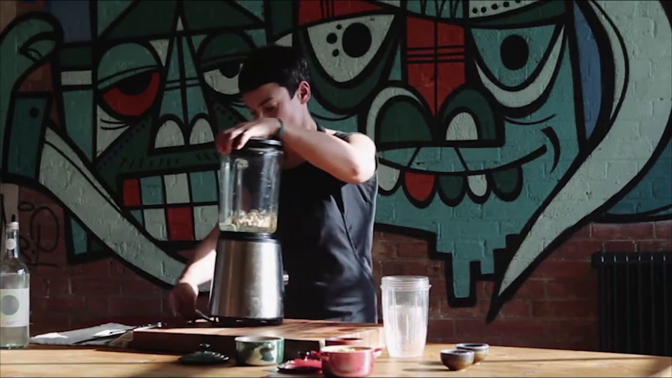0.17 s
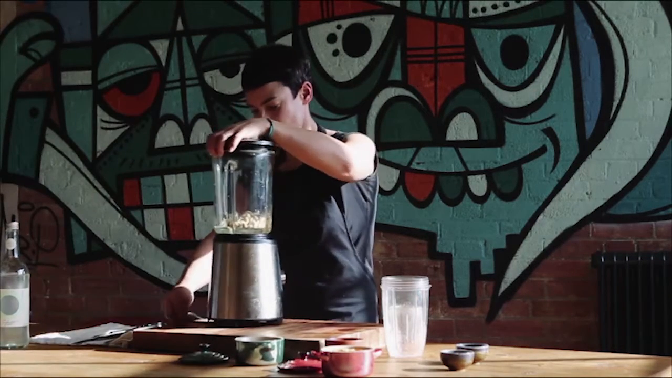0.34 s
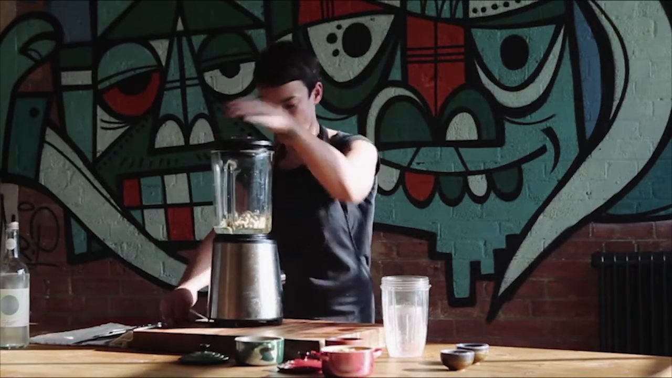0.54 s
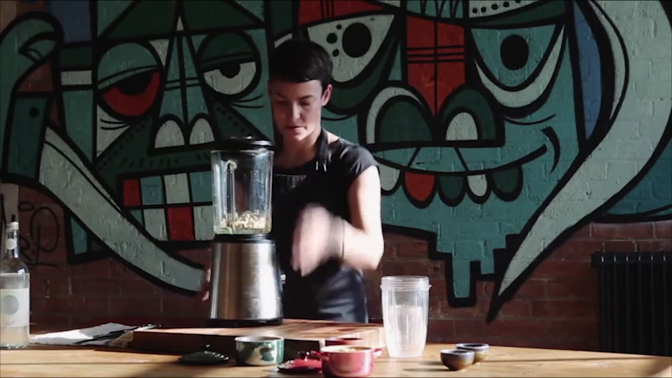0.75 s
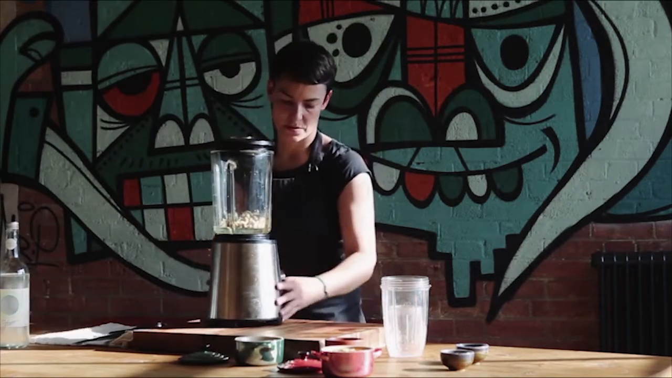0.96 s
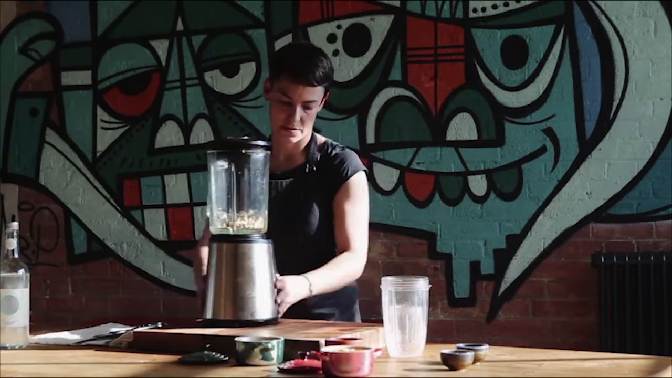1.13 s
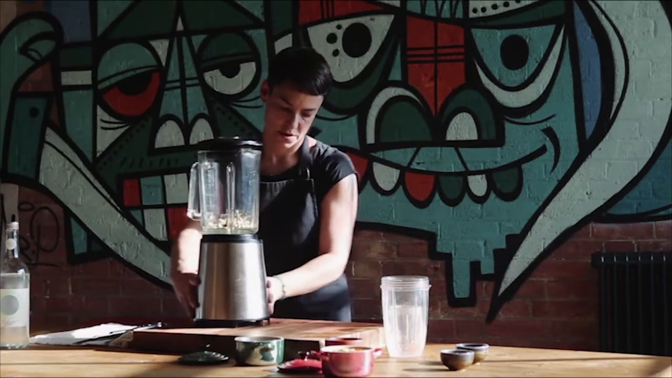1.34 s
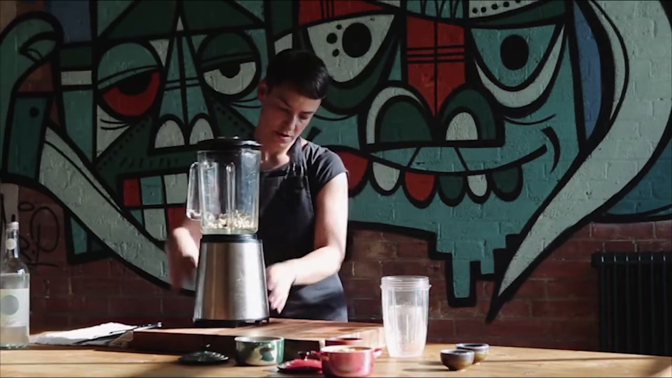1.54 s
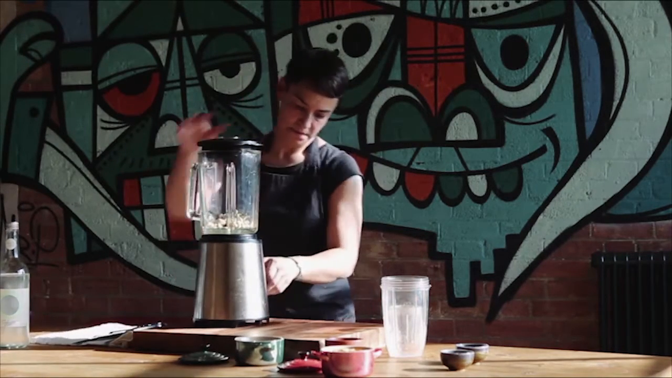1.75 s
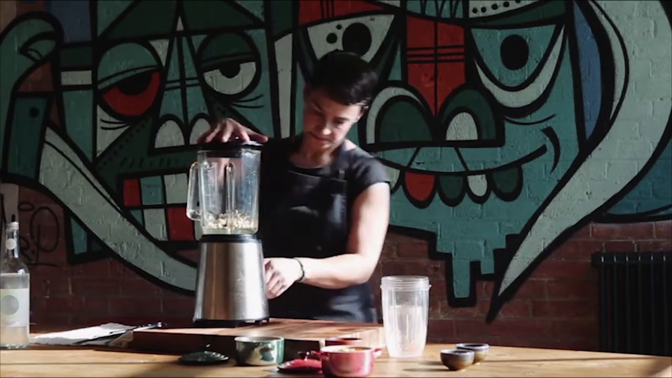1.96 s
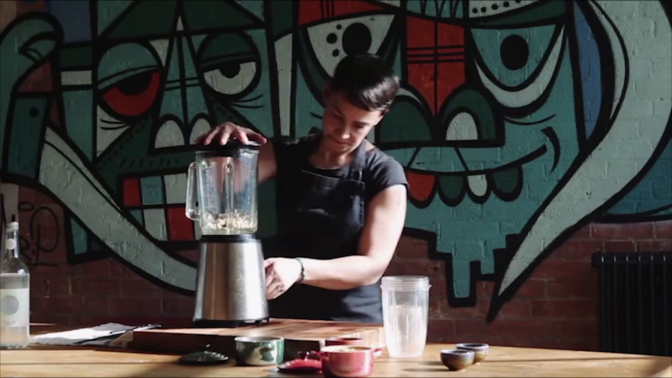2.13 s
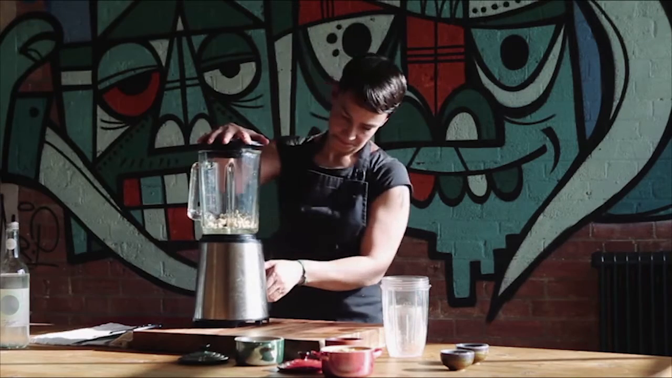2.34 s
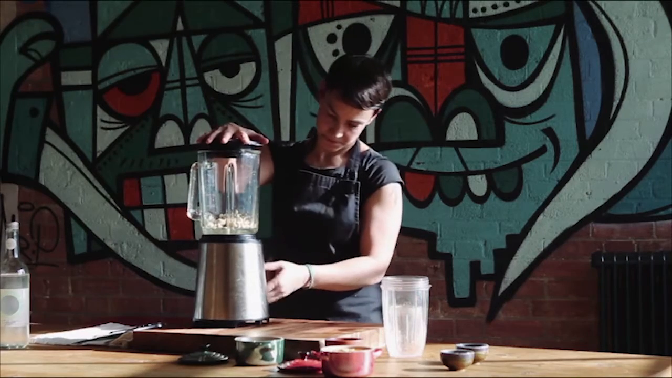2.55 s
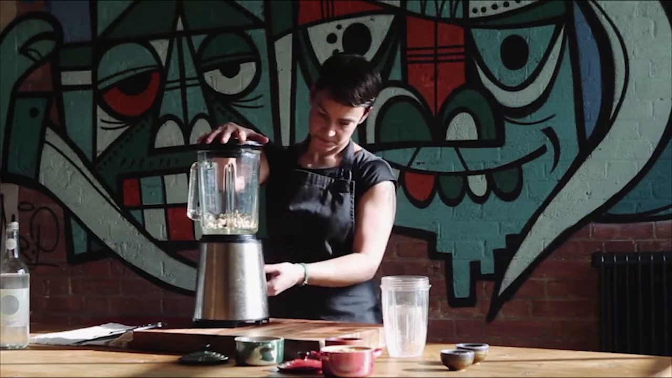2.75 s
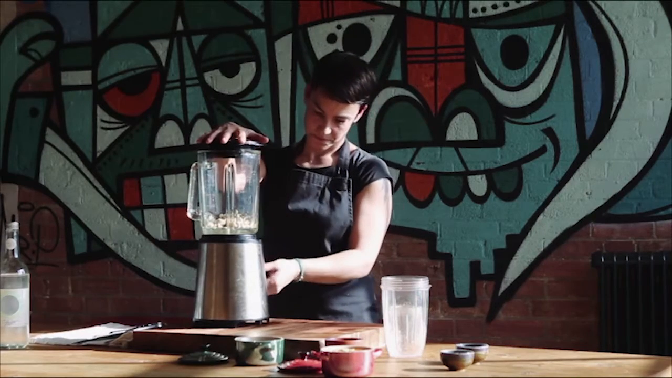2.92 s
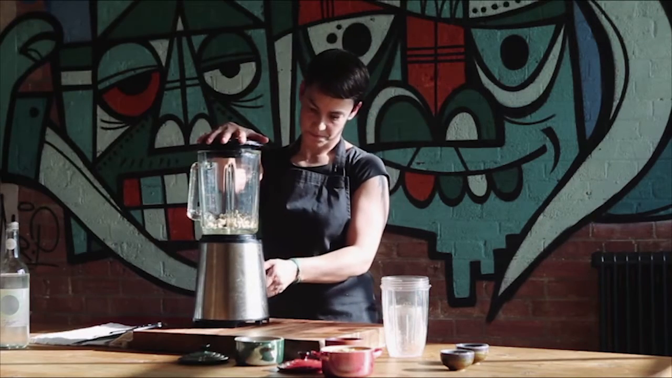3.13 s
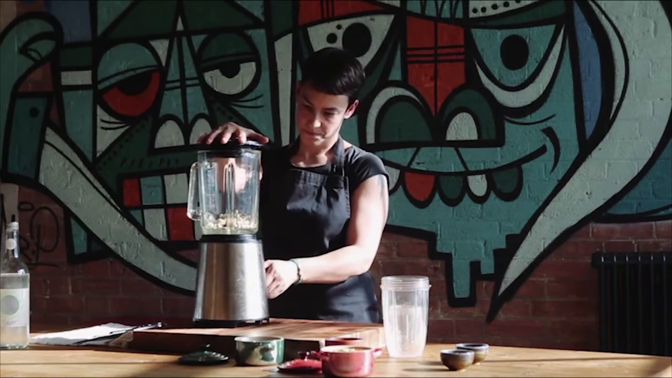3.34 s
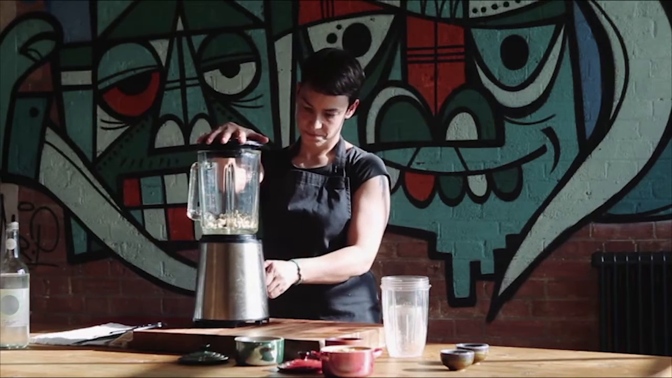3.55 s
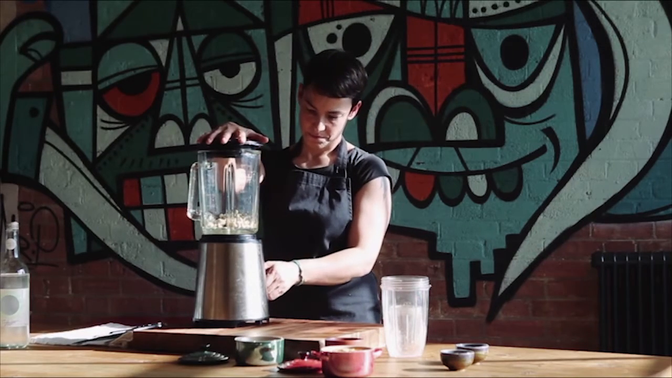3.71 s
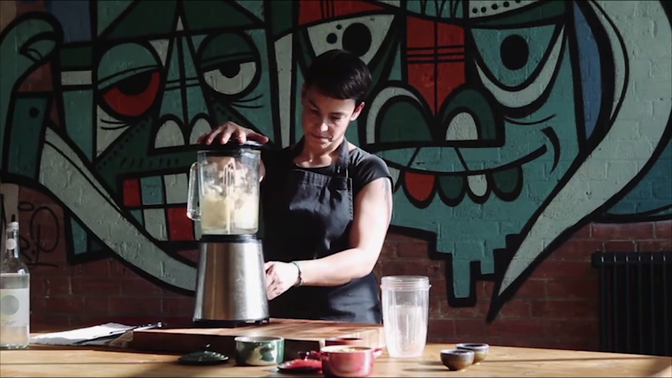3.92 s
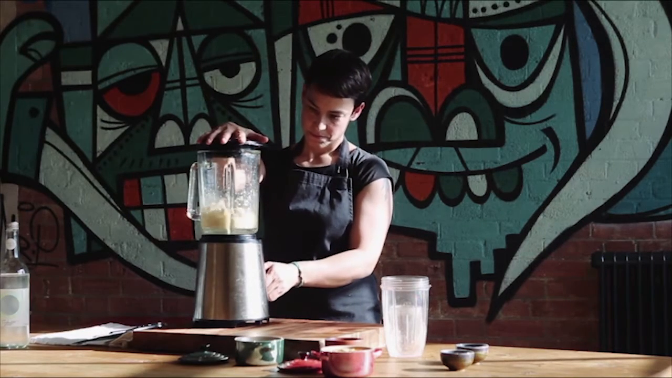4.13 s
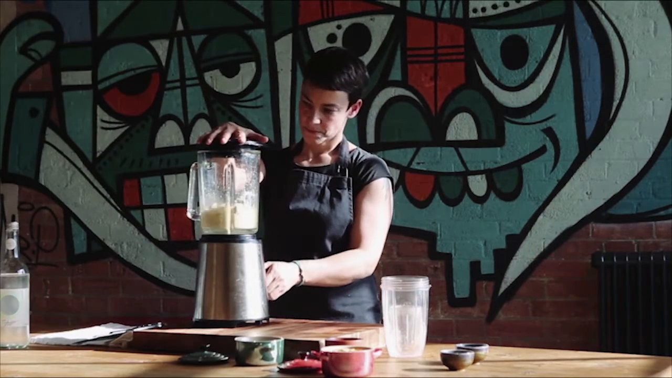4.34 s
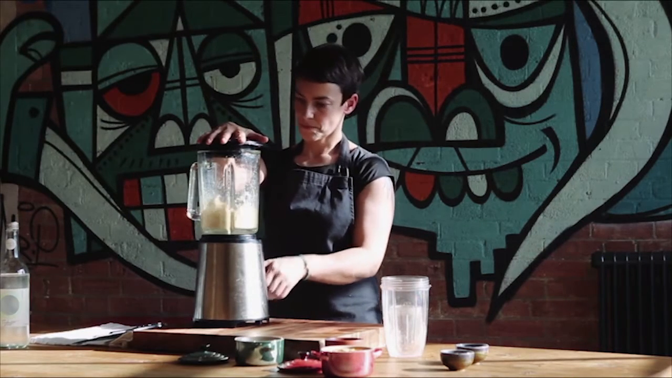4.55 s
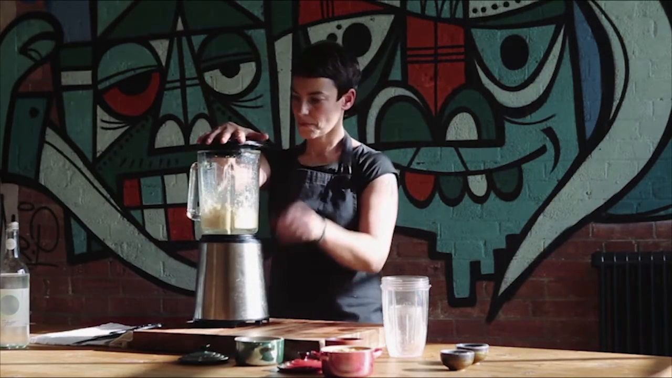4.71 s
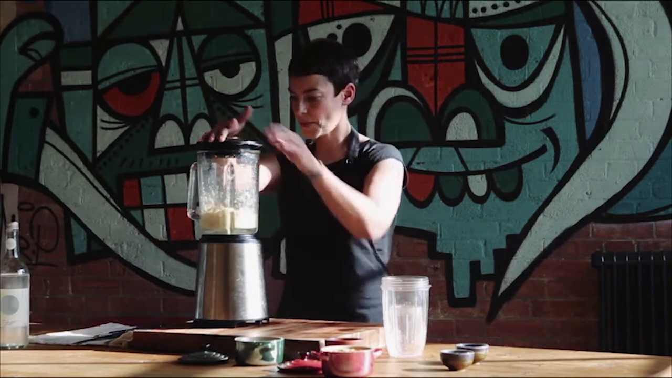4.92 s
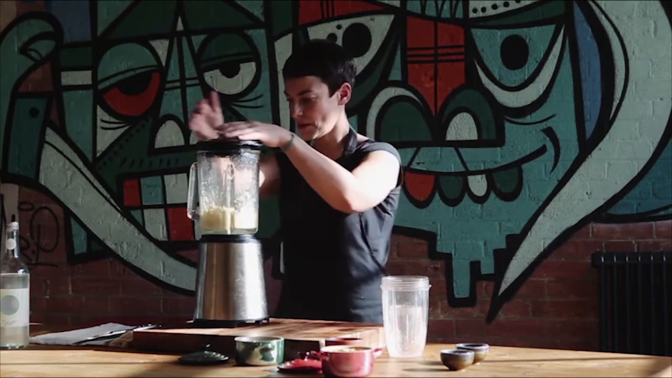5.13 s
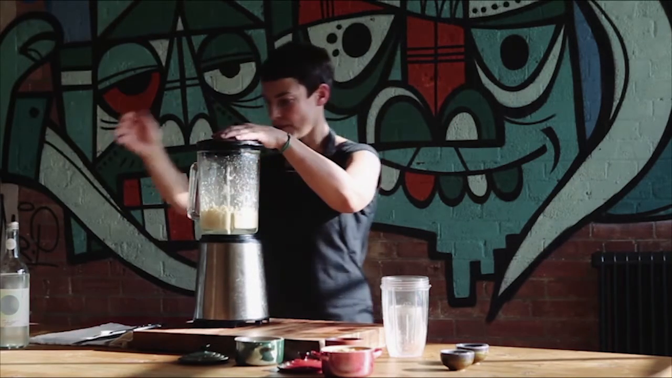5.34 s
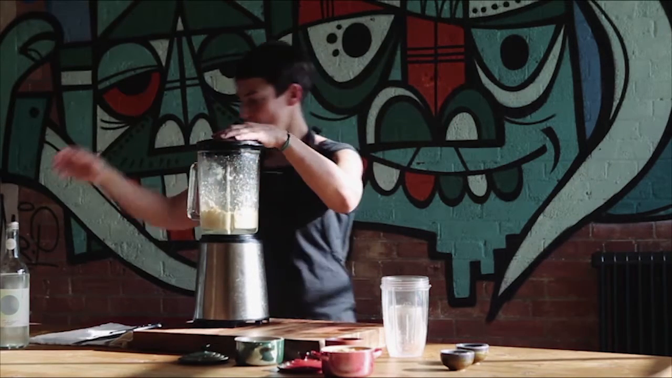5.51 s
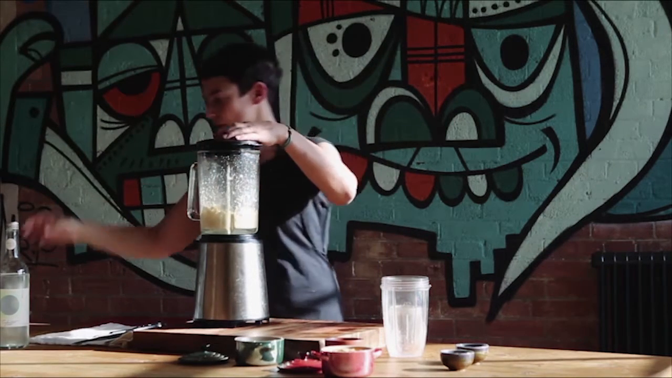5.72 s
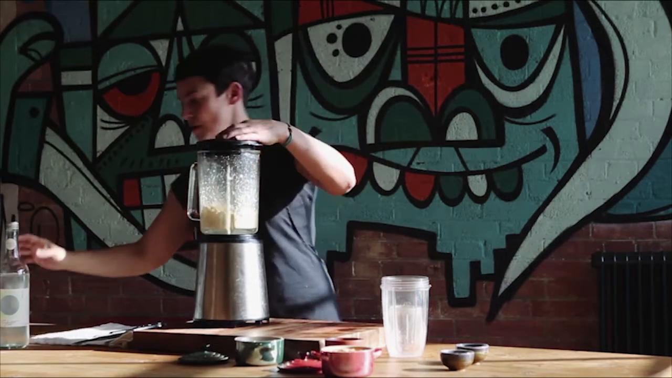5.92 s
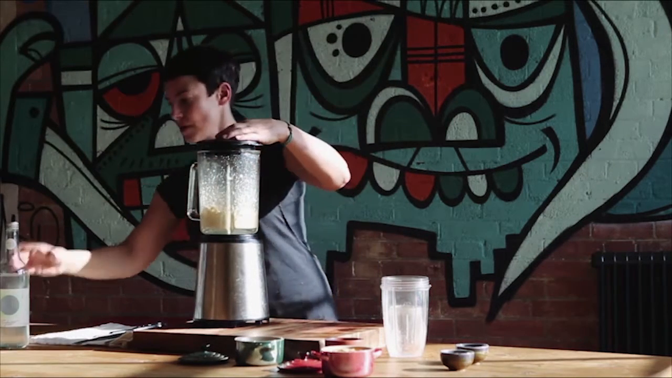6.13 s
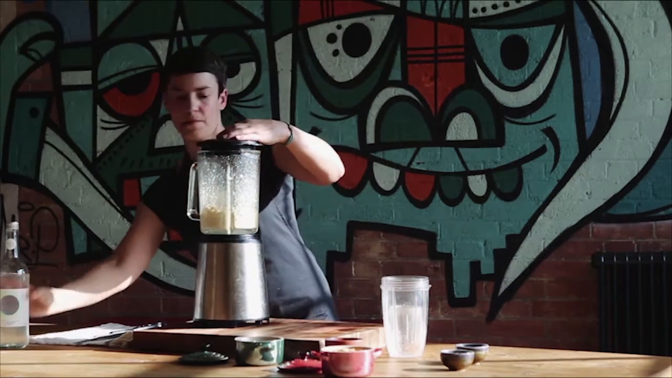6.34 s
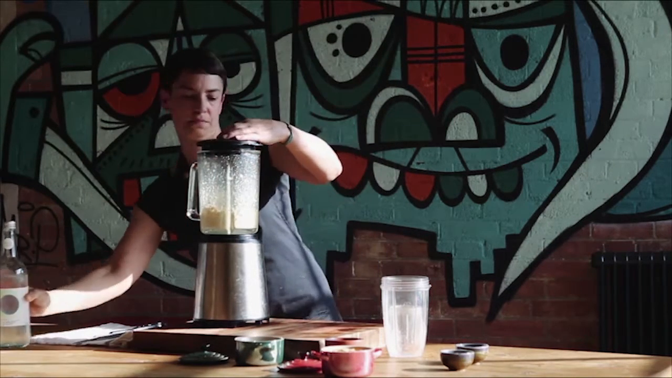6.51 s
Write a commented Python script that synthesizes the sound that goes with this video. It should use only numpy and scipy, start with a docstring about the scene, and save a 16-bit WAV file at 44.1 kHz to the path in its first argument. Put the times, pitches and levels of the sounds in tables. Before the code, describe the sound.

Someone settles a blender with knocks and shuffles in a quiet kitchen; abruptly it roars on, rattling food and climbing to a high whine.

```python
"""Clacks, thuds, a shuffle, a squeak and dial clicks, then a jug blender starts with a jolt and runs up to speed.
The jug is settled on a wooden counter in a brick-walled kitchen: chattering contacts excite coloured bodies.
The rotor hums and its fan whines as sines locked to the speed, which rises as the load thins.
Hard bits of food pelt the ringing jug as random impacts, over a churn of shaped noise."""
import sys
import numpy as np
from scipy import signal
from scipy.fft import rfft, irfft, next_fast_len
from scipy.io import wavfile
from scipy.ndimage import uniform_filter1d

SR = 44100
rng = np.random.default_rng(int(sys.argv[2]) if len(sys.argv) > 2 else 0)


def dump_mix(stems):
    """Bounce the given channels to the path in sys.argv[1] as a 16-bit WAV at rate SR."""
    frames = np.atleast_2d(stems).T  # one column per channel
    limited = np.clip(frames, -1, 1)  # hard clip at full scale
    pcm = np.round(limited * 32767).astype(np.int16)
    wavfile.write(sys.argv[1], SR, pcm)


N = 289737
T = np.arange(N) / SR
START_S = 3.869

# Motor run-up as the load thins. Each row: time in seconds, speed in turns/s, clean whine in dB, hum in dB.
ROTOR_RUN_UP = [(4.15, 191.5, -41, -45), (4.25, 207.6, -28, -41), (4.37, 223.0, -32, -38),
                (4.58, 233.6, -31, -35), (4.8, 242.5, -44, -35), (4.81, 243.2, -32, -32),
                (4.85, 246.0, -46, -34), (4.94, 248.8, -33, -32), (5.21, 256.2, -31, -38),
                (5.33, 258.1, -42, -39), (5.38, 260.1, -34, -35), (5.61, 261.4, -42, -34),
                (5.67, 263.8, -30, -34), (6.25, 272.7, -27, -31), (6.44, 275.4, -32, -33),
                (6.55, 276.2, -30, -33)]
# Weaker rotor lines; 13 fan blades, 24 commutator bars.
# Each row: multiple of speed, dB re rotor level ahead of the casing, roughness rate in Hz.
ROTOR_LINES = [(2, -11, 6.6), (3, -12.5, 18), (24, -15.5, 48), (26, -27, 20), (39, -23.5, 8),
               (48, -16, 350)]
# Radiation of the rotor lines by the casing. Each row: frequency in Hz, gain in dB.
CASING_GAIN = [(1000, -1.5), (5000, 5), (6200, -4), (6550, 4.5), (7200, 6), (9500, 11), (10700, 1),
               (12100, 10), (12500, 0), (14000, 8)]
# Housing resonances. Each row: frequency in Hz, width in Hz, relative level in dB.
HOUSING_MODES = [(598, 110, -2.5), (680, 35, 4), (835, 100, -6)]
# Jug resonances. Each row: frequency in Hz, width in Hz, relative level in dB.
JUG_MODES = [(3474, 318, 2), (3896, 310, 0), (4630, 690, -13)]
# Radiation of the jug wall around its modes. Each row: frequency in Hz, gain in dB.
JUG_WALL_GAIN = [(1000, -9), (3050, -9), (3380, -5.5), (4250, 1), (4750, -11), (5150, -7.5), (5650, -0.5),
                 (6300, -5), (9000, -9)]
# Hard bits caught by the blades. Each row: start in seconds, length in seconds, level at full grip in dB.
BIT_FLURRIES = [(3.915, 0.12, -29), (4.01, 0.093, -25), (4.09, 0.1, -20), (4.235, 0.23, -22),
                (4.49, 0.21, -24), (4.73, 0.15, -22.5), (4.91, 0.083, -25.5), (5.0, 0.06, -31.5),
                (5.28, 0.06, -34.5), (5.375, 0.023, -26.5), (5.45, 0.057, -26.5), (5.55, 0.31, -28.5),
                (5.85, 0.68, -30.5)]
# Churning food. Each row: frequency in Hz, relative density in dB per Hz.
CHURN_SPECTRUM = [(25, -14.5), (70, -20), (130, -12.5), (220, -7.5), (330, 3), (480, -2), (700, 0),
                  (1000, 0), (1300, -3.5), (1650, 2.5), (2000, -5), (3000, -5), (6000, -33)]
# Sloshing resonances. Each row: frequency in Hz, width in Hz, relative level in dB.
SLOSH_MODES = [(2257, 250, 3.5), (2655, 200, 4.5)]
# Droplet spray. Each row: frequency in Hz, relative density in dB per Hz.
SPRAY_SPECTRUM = [(1500, -25), (3300, -11.5), (3800, -2), (4350, 6.5), (4800, 1), (5150, -1), (5600, 1),
                  (6200, 0), (7000, 0), (9000, -2.5), (11000, -3), (12600, -7.5), (13600, -4.5),
                  (16000, -13)]
# Sinking vortex resonances. Each row: from Hz, to Hz, roughness rate in Hz, relative level in dB.
VORTEX_BANDS = [(2804, 1050, 490, -0.5), (10700, 7000, 730, -8), (13140, 9000, 700, -16)]
# Hard knocks on lid and jug. Each row: time in seconds, dry peak in dB, dull above Hz, contact decay in seconds.
CLACK_HITS = [(.037, -45.5, 1200, 0.004), (.122, -40.5, 7000, 0.002), (.338, -43.5, 4000, 0.002),
              (.6203, -24, 9000, 0.0035), (.643, -16, 7100, 0.0033), (1.879, -51, 2000, 0.0048),
              (2.024, -28, 2520, 0.0051), (2.255, -40, 1370, 0.0028), (2.365, -43, 2000, 0.0022),
              (2.939, -47, 9000, 0.0025)]
# Sound of the knocked parts. Each row: frequency in Hz, relative density in dB per Hz.
CLACK_SPECTRUM = [(60, 3), (150, -22), (330, 4), (600, -8.5), (1000, 6.5), (1400, -4.5), (1900, 0),
                  (2600, -3), (3300, -1.5), (4500, -3), (6000, -2), (7500, -6.5), (16000, -9.5)]
# Base bumps the counter. Each row: time in seconds, dry peak in dB, dull above Hz, contact decay in seconds.
THUD_HITS = [(.04, -43, 900, 0.0081), (.175, -45, 2500, 0.0064), (.688, -26.5, 1800, 0.0049),
             (.696, -23, 500, 0.0093), (.724, -29, 600, .015), (.919, -32.5, 1500, 0.018),
             (.942, -22, 795, 0.016), (.975, -30, 1200, 0.054), (1.285, -42, 400, 0.034),
             (1.881, -41.5, 1220, 0.026), (2.025, -31, 1200, 0.0038), (2.184, -39, 1800, 0.0074),
             (2.255, -31.5, 3000, 0.0043), (2.366, -29, 600, 0.0076), (3.872, -26, 1000, 0.046)]
# Sound of the counter. Each row: frequency in Hz, relative density in dB per Hz.
COUNTER_SPECTRUM = [(30, -38), (80, -15), (160, -7.5), (240, -1), (330, 2.5), (420, -4), (520, -3),
                    (750, -7.5), (1100, -13.5), (1700, -21), (4000, -26.5), (16000, -35)]
# Weight on the machine shakes the table frame.
# Each row: time in seconds, dry peak in dB, dull above Hz, contact decay in seconds.
FRAME_SHOVES = [(.625, -40, 40, 0.027), (2.367, -35, 120, 0.03), (3.1, -47, 60, 0.017),
                (3.42, -49, 60, 0.035)]
# Low response of the table frame. Each row: frequency in Hz, relative density in dB per Hz.
FRAME_SPECTRUM = [(15, -9), (30, 6.5), (65, -3), (100, 0.5), (160, 2.5), (300, -29), (1000, -57)]
# Detents of the dial. Each row: time in seconds, dry peak in dB, contact decay in seconds.
DIAL_CLICKS = [(3.1, -25, 0.0038), (3.2558, -33, 0.0012), (3.269, -36.5, 0.0038), (3.3485, -36.5, 0.0013),
               (3.4067, -33, 0.0012), (3.4213, -29, 0.0028), (3.432, -34, 0.0023), (3.4523, -32, 0.0011),
               (3.4939, -38, 0.0016)]
# Ringing of dial and panel. Each row: frequency in Hz, width in Hz, relative level in dB.
DIAL_PANEL_MODES = [(130, 170, -11), (378, 80, 5), (840, 210, -1.5), (1120, 76, 3), (1470, 130, -1),
                    (2070, 67, -1.5), (2820, 360, -9), (4620, 550, -13), (7250, 1900, -17),
                    (9780, 730, -5.5), (10800, 960, -2), (13500, 980, -8.5)]
# Base and the hands on it slide. Each row: start in seconds, length in seconds, level in dB.
SHUFFLE_SLIDES = [(0, 0.4, -66), (0.72, 0.5, -53), (1.22, 0.3, -54), (1.45, 0.29, -55.5), (1.87, 0.07, -60),
                  (1.945, 0.12, -52.5), (2.2, 0.14, -57), (2.54, 0.25, -67), (3.1, 0.36, -64)]
# Colour of the shuffle. Each row: frequency in Hz, relative density in dB per Hz.
RUB_SPECTRUM = [(40, -39), (120, 2), (220, -5), (400, -2), (550, -12), (800, -6.5), (1200, -10.5),
                (2500, -14), (5000, -23), (8000, -29.5), (16000, -33)]
# Quiet kitchen with a low hum. Each row: frequency in Hz, relative density in dB per Hz.
AMBIENCE_SPECTRUM = [(15, -22), (25, -2), (70, -12.5), (102, -2), (135, -11), (180, -15), (335, -10),
                     (463, -19), (1130, -26), (1600, -32), (4140, -39.5), (12500, -39), (16000, -46)]
# Kitchen reverberation. Each row: frequency in Hz, 60 dB decay time in seconds.
KITCHEN_T60 = [(100, 0.94), (300, 0.42), (1000, 0.63), (4000, 0.44), (14000, 0.35)]

KICK_TURNS_PER_S, TOP_TURNS_PER_S = 78, 274   # just after switching on; nominal full speed
HUM_RUN_UP_DB_PER_OCTAVE, HUM_WAVER_DB, WHINE_WAVER_DB = 7, 0.4, 0.9
BRAY_HZ, BRAY_WIDTH_HZ, BRAY_DB = 1850, 300, -29.5   # casing resonance swept by the rising whine
INRUSH_HZ, INRUSH_DB, INRUSH_S = 100.2, -38.5, 0.063   # mains tone of the starting current
ROTOR_DB, ROTOR_DB_PER_OCTAVE = -32, 22   # reference for the lines at full speed; growth with speed
STRAIN_DB, STRAIN_S, STRAIN_RELEASE_S, EASY_RUN_DB = -34.5, 0.74, 0.22, -46.5   # growl of a hard pull; floor
GROWL_WAVER_DB = 0.2   # slight random wavering of the growl
FLURRY_ATTACK_S, FLURRY_RELEASE_S, STRAY_BITS_DB = 0.012, 0.043, -38.5
IMPACTS_PER_S, IMPACT_GROWTH_PER_S2 = 430, 4800   # pieces are cut ever finer
CHURN_DB, GRIP_TURNS_PER_S = -30.5, 178   # the food churns fully above this speed
SPRAY_DB, SPRAY_DB_PER_OCTAVE = -29.9, 8   # at full speed; growth with speed
SLOSH_DB, COARSE_SPRAY_HZ = -35, 7500
PASTE_S = 4.9   # the sloshing starts to fade and a vortex opens
VORTEX_DB, VORTEX_ATTACK_S, VORTEX_HOLD_S, VORTEX_RELEASE_S = -31.5, 0.065, 0.39, 0.43
VORTEX_SETTLE_S = 0.62
SLIDE_ATTACK_S, SLIDE_RELEASE_S = 0.029, 0.1
SQUEAK_S, SQUEAK_LENGTH_S, SQUEAK_DB = 1.409, 0.015, -42.5
SQUEAK_FROM_HZ, SQUEAK_TO_HZ, SQUEAK_SETTLE_S = 610, 404, 0.0156
DIAL_DULL_HZ = 11000
AMBIENCE_DB = -60.5
CUTOFF_HZ = 15900


def motor(speed):
    """Imbalance hums once a turn, 13 fan blades whine, brushes sing roughly above, the housing growls."""
    angle = 2 * np.pi * np.cumsum(speed) / SR
    return rotor_hum(speed, angle) + inrush() + fan_whine(speed, angle) + upper_lines(speed, angle) + growl()


def rotor_speed():
    """Turns per second: a kick, a steady run-up, then a slow climb."""
    run_up = [(s, turns) for s, turns, *_ in ROTOR_RUN_UP]
    return in_time([(START_S, KICK_TURNS_PER_S)] + run_up)[0]


def rotor_hum(speed, angle):
    """Imbalance shakes the machine once a turn."""
    _, _, hum_db = in_time(ROTOR_RUN_UP)
    octaves = np.log2(np.minimum(speed / ROTOR_RUN_UP[0][1], 1))
    hum_db = hum_db + HUM_RUN_UP_DB_PER_OCTAVE * octaves
    return from_db(hum_db + HUM_WAVER_DB * drift(6.1)) * np.sqrt(2) * np.sin(angle)


def inrush():
    """Starting current sounds briefly at a fixed mains tone."""
    gain = swell(START_S, INRUSH_S, INRUSH_DB, attack_s=0.038, release_s=0.05)
    return gain * np.sqrt(2) * np.sin(2 * np.pi * INRUSH_HZ * T)


def fan_whine(speed, angle):
    """Blade passing whines at 13 times the speed and brays through a casing resonance."""
    _, whine_db, _ = in_time(ROTOR_RUN_UP)
    # the whine is rough and blurred at low speed and nearly clean at full speed
    blur = np.clip((150 / speed) ** 7, 0, 1)
    fan_angle, fan_hz = 13 * angle, 13 * speed
    clean = np.sqrt(2 * (1 - blur)) * np.sin(fan_angle)
    fan = clean + np.sqrt(blur) * rough_line(fan_angle, rate_hz=130)
    bray = from_db(BRAY_DB) / (1 + (2 * (fan_hz - BRAY_HZ) / BRAY_WIDTH_HZ) ** 2)
    gain = (1 - blur) * from_db(whine_db + WHINE_WAVER_DB * drift(25))
    return (gain + bray) * fan


def upper_lines(speed, angle):
    """Rough rotor, fan and commutator lines grow with speed and radiate through the casing."""
    rotor_db = ROTOR_DB + ROTOR_DB_PER_OCTAVE * np.log2(speed / TOP_TURNS_PER_S)
    lines = sum(from_db(rotor_db + db) * rough_line(round(k) * angle, rate_hz)
                for k, db, rate_hz in ROTOR_LINES)
    return colour(lines, CASING_GAIN)


def growl():
    """Impacts ring the housing and noise shakes the frame, most while the motor pulls hard."""
    pull = swell(START_S, STRAIN_S, STRAIN_DB, attack_s=0.017, release_s=STRAIN_RELEASE_S)
    strain = np.maximum(pull, from_db(EASY_RUN_DB))
    housing = rms_one(resonate(grains(900, spread_db=1.0), HOUSING_MODES))
    rumble = from_db(-16) * noise(FRAME_SPECTRUM)
    return strake_gain(strain) * (housing + rumble)


def strake_gain(strain):
    """Strain gain with a slight random waver."""
    return strain * from_db(GROWL_WAVER_DB * drift(15))


def food(speed):
    """Bits pelt the jug, food churns and sloshes, droplets spray, a vortex opens."""
    grip = np.minimum(speed / GRIP_TURNS_PER_S, 1)
    impacts = bit_impacts()
    churn = grip ** 1.5 * from_db(CHURN_DB + 0.75 * drift(40)) * noise(CHURN_SPECTRUM)
    return pelting(grip, impacts) + churn + slosh() + spray(speed, impacts) + vortex()


def bit_impacts():
    """Random hits become more frequent as the blades cut the pieces finer."""
    rate = IMPACTS_PER_S + IMPACT_GROWTH_PER_S2 * np.maximum(T - START_S, 0)
    impacts = grains(rate * from_db(2.5 * drift(25)), spread_db=2.5)
    local_power = np.abs(uniform_filter1d(impacts ** 2, size=3000))
    return impacts / np.sqrt(local_power + 1e-6)   # fewer bits hit harder


def pelting(grip, impacts):
    """Flurries of hard bits excite the jug modes, radiated by its wall."""
    flurries = swells(BIT_FLURRIES, FLURRY_ATTACK_S, FLURRY_RELEASE_S)
    gain = np.maximum(flurries, from_db(STRAY_BITS_DB))
    return grip * gain * rms_one(colour(resonate(impacts, JUG_MODES), JUG_WALL_GAIN))


def slosh():
    """Loose food excites two resonances, fading once the paste forms."""
    loose = swell(START_S, PASTE_S - START_S, SLOSH_DB, attack_s=0.57, release_s=1.0)
    return loose * rms_one(resonate(grains(6000, spread_db=0.5), SLOSH_MODES))


def spray(speed, impacts):
    """Droplets hit the wall; faster blades make them louder and finer."""
    effort = speed / TOP_TURNS_PER_S
    droplets = rms_one(grains(16000, spread_db=2.0)) + 0.75 * rms_one(impacts)
    full = rms_one(patchy_treble(colour(droplets, SPRAY_SPECTRUM), patchy_db=1.5))
    coarse = signal.lfilter(*signal.butter(1, COARSE_SPRAY_HZ, fs=SR), full)
    gain = from_db(SPRAY_DB + SPRAY_DB_PER_OCTAVE * np.log2(effort))
    return gain * (coarse + effort ** 2 * (full - coarse))


def patchy_treble(x, patchy_db, count=14):
    """Narrow treble bands of the spray swell and fade slowly at random."""
    centres_hz = np.geomspace(5000, 15000, count)
    return x + sum((from_db(patchy_db * drift(3.2)) - 1) * resonate(x, [(hz, 450, 0)]) for hz in centres_hz)


def vortex():
    """The paste opens a funnel whose broad resonances sink as it deepens."""
    out = 0
    for from_hz, to_hz, rate_hz, db in VORTEX_BANDS:
        phase = 2 * np.pi * np.cumsum(settle(PASTE_S, from_hz, to_hz, VORTEX_SETTLE_S)) / SR
        out = out + from_db(db) * rough_line(phase, rate_hz)
    return swell(PASTE_S, VORTEX_HOLD_S, VORTEX_DB, VORTEX_ATTACK_S, VORTEX_RELEASE_S) * out


def jolt():
    """Switching on knocks the jug into ringing."""
    return strikes([(3.872, -19.5, 6000, 0.0015)], lambda force: resonate(force, JUG_MODES))


def handling():
    """Knocks, bumps, dial clicks and a squeak echo in the kitchen; the shuffle stays dry."""
    clacks = strikes(CLACK_HITS, lambda force: colour(force, CLACK_SPECTRUM))
    thuds = strikes(THUD_HITS, lambda force: colour(force, COUNTER_SPECTRUM))
    shoves = strikes(FRAME_SHOVES, lambda force: colour(force, FRAME_SPECTRUM))
    clicks = [(s, db, DIAL_DULL_HZ, contact_s) for s, db, contact_s in DIAL_CLICKS]
    dial = strikes(clicks, lambda force: resonate(force, DIAL_PANEL_MODES))
    hard = kitchen(clacks + squeak(), wet_db=-12)
    low = kitchen(thuds + shoves, wet_db=-3.0)
    return hard + low + kitchen(dial, wet_db=-17) + shuffle()


def shuffle():
    """Sliding is a run of tiny slips."""
    slips = grains(2500 * from_db(2.3 * drift(20)), spread_db=0.5)
    slides = swells(SHUFFLE_SLIDES, SLIDE_ATTACK_S, SLIDE_RELEASE_S)
    return slides * rms_one(colour(slips, RUB_SPECTRUM))


def squeak():
    """Stick and slip of a rubber foot on wood, falling in pitch as it comes to rest."""
    hz = settle(SQUEAK_S, SQUEAK_FROM_HZ, SQUEAK_TO_HZ, SQUEAK_SETTLE_S)
    phase = 2 * np.pi * np.cumsum(hz * (1 + 0.039 * drift(150))) / SR
    gain = swell(SQUEAK_S, SQUEAK_LENGTH_S, SQUEAK_DB, attack_s=0.006, release_s=0.009)
    return gain * (np.sin(phase) + 0.66 * np.sin(2 * phase))


def strikes(rows, body, size=8192):
    """Each contact is a brief chatter, dulled by its softness, that sets a body sounding."""
    out, age_s = np.zeros(N + size), np.arange(size) / SR
    for s, db, dull_hz, contact_s in rows:
        force = rng.standard_normal(size) * np.exp(-age_s / contact_s)
        hit = body(signal.lfilter([1], [1, -np.exp(-2 * np.pi * dull_hz / SR)], force))
        at = max(round(s * SR), 0)
        out[at:at + size] += from_db(db) * hit / np.abs(hit).max()
    return out[:N]


def kitchen(x, wet_db):
    """Add a diffuse tail whose decay time depends on frequency."""
    age_s, tail = T[:SR], 0
    edges_hz = np.geomspace(70, 17000, 9)
    for low, high in zip(edges_hz, edges_hz[1:]):
        band_pass = signal.butter(2, [low, high], "band", fs=SR, output="sos")
        band = signal.sosfilt(band_pass, rng.standard_normal(SR))
        tail = tail + band * 1000 ** (-age_s / at_hz(KITCHEN_T60, np.sqrt(low * high)))
    tail = tail * (1 - np.exp(-age_s / 0.0046))
    return x + from_db(wet_db) * signal.fftconvolve(x, tail / np.linalg.norm(tail))[:N]


def ambience():
    """Steady coloured noise of the quiet kitchen."""
    return from_db(AMBIENCE_DB) * noise(AMBIENCE_SPECTRUM)


def from_db(db):
    """Decibels to gain."""
    return 10 ** (np.asarray(db) / 20)


def rms_one(x):
    """Scale to unit power."""
    return x / np.sqrt(np.mean(x ** 2) + 1e-20)


def in_time(rows):
    """One curve per table column after the time."""
    s, *columns = np.transpose(rows)
    return [np.interp(T, s, c) for c in columns]


def at_hz(points, hz):
    """Read a table on a log-frequency axis."""
    f, value = np.transpose(points)
    return np.interp(np.log(np.maximum(hz, 1)), np.log(f), value)


def colour(x, spectrum):
    """Causal (minimum-phase) filter with the given spectrum."""
    size = next_fast_len(2 * len(x), real=True)
    gain = from_db(at_hz(spectrum, np.fft.rfftfreq(size, 1 / SR)))
    cepstrum = irfft(np.log(gain), size)
    # fold the cepstrum onto positive time
    cepstrum[1:size // 2] *= 2
    cepstrum[size // 2 + 1:] = 0
    return irfft(rfft(x, size) * np.exp(rfft(cepstrum)), size)[:len(x)]


def noise(spectrum):
    """Coloured noise of unit power."""
    return rms_one(colour(rng.standard_normal(N), spectrum))


def drift(rate_hz):
    """Random wander of unit RMS, mostly below the given rate."""
    size = next_fast_len(N, real=True)
    slope = 1 + (np.fft.rfftfreq(size, 1 / SR) / rate_hz) ** 4
    return rms_one(irfft(rfft(rng.standard_normal(size)) / np.sqrt(slope), size)[:N])


def rough_line(phase, rate_hz):
    """A narrow band of noise riding on a moving pitch; unit power."""
    return drift(rate_hz) * np.sin(phase) + drift(rate_hz) * np.cos(phase)


def resonate(x, modes):
    """Parallel resonances of alternating sign."""
    out = 0
    for k, (hz, width_hz, db) in enumerate(modes):
        r = np.exp(-np.pi * width_hz / SR)
        poles = [1, -2 * r * np.cos(2 * np.pi * hz / SR), r * r]
        ring = signal.lfilter([1, 0, -1], poles, x + 1e-18)
        out = out + (-1) ** k * from_db(db) * (1 - r * r) / 2 * ring
    return out


def grains(per_s, spread_db):
    """Random impacts, mostly small with a few large."""
    sizes = from_db(spread_db * np.minimum(rng.exponential(1, N), 4))
    return sizes * rng.choice([-1, 1], N) * (rng.random(N) < per_s / SR)


def swell(s, length_s, db, attack_s, release_s):
    """Gain that rises, holds to the end of its length and dies away."""
    rise = np.clip((T - s) / attack_s, 0, 1)
    return from_db(db) * rise * np.exp(-np.maximum(T - s - length_s, 0) / release_s)


def swells(rows, attack_s, release_s):
    """A run of swells; the strongest prevails."""
    return np.max([swell(s, length_s, db, attack_s, release_s) for s, length_s, db in rows], axis=0)


def settle(s, from_hz, to_hz, settle_s):
    """A pitch that glides from a given moment towards its resting value."""
    return to_hz + (from_hz - to_hz) * np.exp(-np.maximum(T - s, 0) / settle_s)


def scene():
    """Handling, then the blender cuts in with a jolt; both channels are identical."""
    switched_on = np.clip((T - START_S) / 0.0011, 0, 1)
    speed = rotor_speed()
    blender = (motor(speed) + food(speed)) * switched_on + jolt()
    mono = blender + handling() + ambience()
    return np.stack([mono, mono])


def record(dry):
    """The top is cut steeply."""
    low_pass = signal.ellip(12, .1, 80, CUTOFF_HZ, fs=SR, output="sos")
    return signal.sosfilt(low_pass, dry)


dry = scene()
out = record(dry)
dump_mix(out)
```